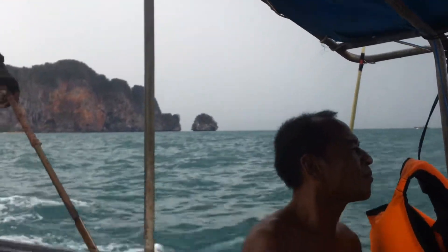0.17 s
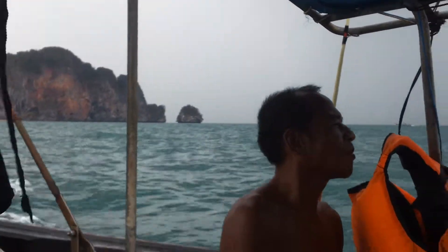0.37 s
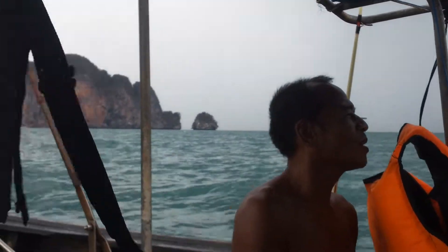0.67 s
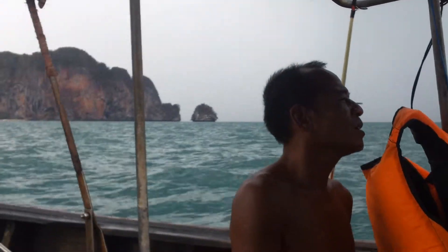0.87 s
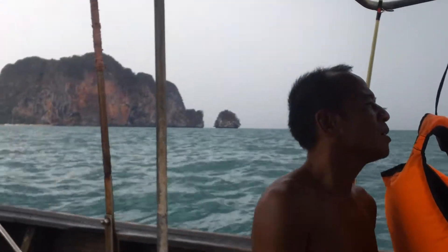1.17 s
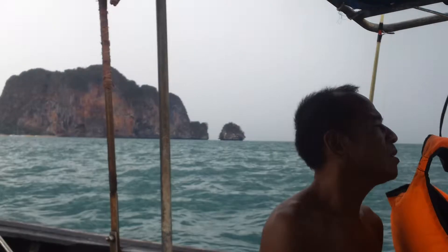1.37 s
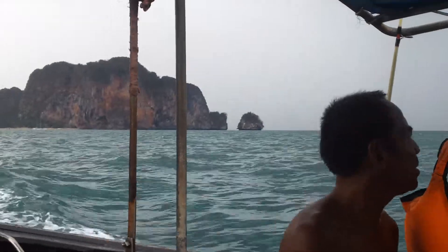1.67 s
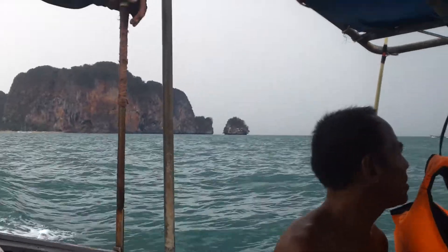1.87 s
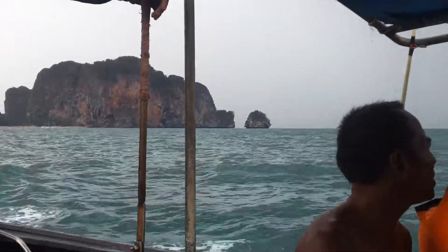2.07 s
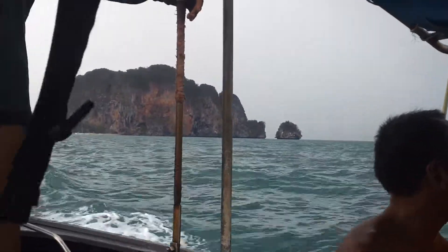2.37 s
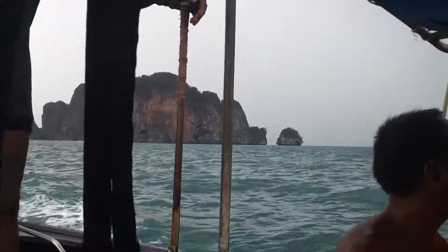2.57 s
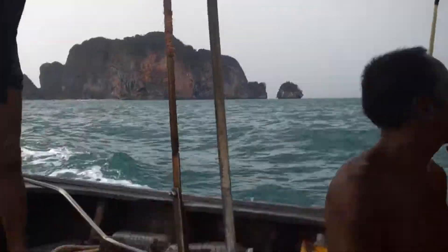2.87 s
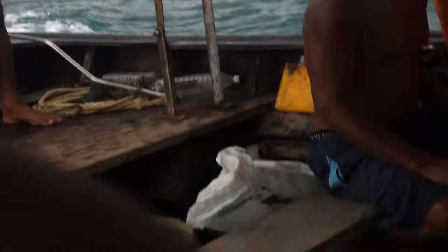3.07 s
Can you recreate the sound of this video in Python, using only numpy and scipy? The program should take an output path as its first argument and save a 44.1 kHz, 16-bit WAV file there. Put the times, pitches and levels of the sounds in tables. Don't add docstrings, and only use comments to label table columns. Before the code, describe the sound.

Unsilenced boat diesel drones steadily, roaring and clattering over hissing wash, with late wind thumps

```python
import sys
import numpy as np
from scipy import signal
from scipy.fft import rfft, irfft, next_fast_len
from scipy.io import wavfile

SR = 44100
rng = np.random.default_rng(int(sys.argv[2]) if len(sys.argv) > 2 else 0)


def invert_db(level):
    return 10 ** (np.asarray(level, dtype=float) / 20)


def materialize(psi):
    bounded = np.clip(np.atleast_2d(psi).T, -1, 1)
    quanta = np.round(bounded * 32767).astype(np.int16)
    wavfile.write(sys.argv[1], SR, quanta)


N = 142443

# (time [s], rate [Hz])
CYCLE_RATE = [(0, 12.95), (1.0, 12.97), (1.4, 13.02), (2.1, 12.98), (2.3, 13.16), (3.23, 13.2)]
# (time [s], level [dB])
ENGINE_LOAD = [(0.0, -17.5), (0.48, -21), (1.02, -19), (1.2, -21.5), (1.74, -20), (2.22, -20),
               (3.07, -19.5), (3.23, -19.5)]
# (multiple of the cycle rate [1], level [dB rms])
EXHAUST_ORDERS = [(4, -48), (6, -55), (8, -42), (10, -42), (12, -29.5), (14, -47), (16, -36.5), (18, -35),
                  (20, -31), (22, -40.5), (28, -35), (31, -36.5), (44, -34), (52, -37.5)]
# (time [s], level [dB])
BOAT_SWING = [(0, 2.5), (.15, 4.5), (.36, 3), (1.2, -0.5), (1.65, 1), (2.06, -1.5), (2.37, 0), (2.6, -3.5),
              (3.23, 4.5)]
# (place in cycle [0-1], exhaust puff [dB], cover ring [dB], knock [dB])
CYLINDERS = [
    (.06, 0, -6, 0),
    (.32, -1, -5, -1),
    (.59, -1, -2, -2),
    (.80, -1, 3.5, -1),
]
# (frequency [Hz], density [dB per Hz])
ROAR_SPECTRUM = [(40, -40), (90, -18.5), (150, 3.5), (300, 3.5), (500, -4), (900, -2.5), (1500, -6.5),
                 (4000, -25)]
# (frequency [Hz], width [Hz], boost [dB])
PIPE_MODES = [(243, 49, 2.8), (354, 15, 5), (388, 48, 10.1), (565, 53, 8.8), (627.4, 13.6, 14.5),
              (683, 110, 6.3), (877, 27, 7), (1123, 48, 6), (1204, 170, 9.1)]
# (frequency [Hz], width [Hz], level [dB], left over right [dB])
COVER_MODES = [(1614.4, 70, -22, 8.5), (1517, 75, -31, 4), (1377, 128, -24.5, 5), (1839, 45, -29, 9)]
# (frequency [Hz], width [Hz], level [dB], left over right [dB])
BLOCK_MODES = [(2420, 22, -41, 8), (2565, 140, -29, 3.5), (3250, 100, -28.5, 10), (4170, 250, -30, -2.5),
               (4790, 53, -42.5, 23), (4915, 26, -36.5, -5.5), (8170, 260, -32, 1)]
# (time [s], centre [Hz], level [dB])
INTAKE_WHISTLE = [(0, 6800, -25), (.45, 6950, -23), (.9, 6900, -24), (1.35, 7020, -22.5), (1.62, 6780, -25),
                  (1.9, 6950, -22), (2.5, 7020, -21.5), (2.8, 7030, -22), (3.23, 6860, -23.5)]
# (frequency [Hz], likeness [0-1])
PORT_LIKENESS = [(60, 0.35), (150, 0.88), (330, 1), (480, 0.67), (650, 0.49), (1100, 0.36), (1600, 0.11),
                 (3000, 0.07)]
# (frequency [Hz], lag [rad])
PORT_LAG = [(40, 0.66), (500, 0.39), (1000, 1.27), (1500, 3.73), (2300, 4.64), (3000, 9.64)]
# (frequency [Hz], left over right [dB])
PORT_BALANCE = [(30, 6), (100, 3), (300, 1), (800, 0), (1200, 4), (3000, -4.5)]
# (frequency [Hz], density [dB per Hz])
WAKE_SPECTRUM = [(300, -3.5), (1000, -4.5), (2200, -3.5), (3500, -3), (5800, -9.5), (8000, -12.5),
                 (11000, -19.5), (14000, -43.5)]
# (time [s], level [dB])
WAKE_SWELL = [(0.0, -17.5), (0.78, -17), (1.2, -16), (1.6, -17.5), (1.85, -16.5), (3.23, -17.5)]
# (frequency [Hz], left over right [dB])
WAKE_BALANCE = [(300, 9.5), (2500, -1), (5500, 3), (7000, -0.5), (9000, -14.5), (11000, -13), (14000, -32)]
# (time [s], length [s], left [dB], right [dB], top frequency [Hz])
WIND_BUFFETS = [(0.072, 0.039, -28, -20, 590), (0.097, 0.023, -33, -16, 600), (0.354, 0.034, -26, -32, 250),
                (2.036, 0.047, -19, -16, 1010), (1.532, 0.031, -10.5, -23, 500),
                (1.574, 0.04, -11.5, -26, 457), (2.252, 0.014, -22, -8, 594),
                (2.262, 0.013, -20, -4.5, 1120), (2.33, .015, -15, -17, 710), (2.4, 0.017, -36, -12, 595),
                (2.47, 0.016, -34, -9.5, 750), (2.483, .012, -30, -15, 604), (2.529, 0.046, -5, -7, 855),
                (2.526, 0.0069, -17, -5, 2700), (2.545, 0.011, -8, -17, 880), (2.645, 0.015, -14, -14, 790),
                (2.654, 0.0098, -16, -7, 900), (2.626, 0.012, -7, -11, 503), (2.696, 0.01, -32, -6, 800),
                (2.696, 0.0038, -30, -11, 2000), (2.706, 0.0093, -18, -7, 1000),
                (2.772, 0.061, -22, -18, 594), (2.796, .018, -11, -9.5, 940), (2.846, 0.017, -15, -32, 600),
                (3.081, 0.019, -17, -44, 690)]
# (time [s], level [dB])
WIND_STRENGTH = [(0, -2), (.8, 3), (1.4, 8), (2.1, 5), (2.3, 14), (2.75, 17.5), (3.23, 2)]

PORT_HZ, PORT_WIDTH_HZ, PORT_DB = 6947, 550, 11
KNOCK_S = .003


def rms_one(x):
    return x / np.sqrt(np.mean(x ** 2) + 1e-20)


def in_time(rows):
    return np.interp(np.arange(N) / SR, *np.transpose(rows))


def at_hz(points, hz):
    table_hz, value = np.transpose(points)
    return np.interp(np.log(hz + 1), np.log(table_hz), value)


def drift(rate_hz):
    r = np.exp(-80 * np.pi * rate_hz / SR)
    noise = rng.standard_normal(N // 40 + 2002)
    slow = signal.lfilter([1], [1, -2 * r, r * r], noise)[2000:]
    return np.interp(np.arange(N) / 40, np.arange(len(slow)), rms_one(slow))


def shape(x, gain):
    size = next_fast_len(N + 4096)
    hz = np.arange(size // 2 + 1) * SR / size
    return irfft(rfft(x, size) * gain(hz), size)[..., :N]


def resonance(x, hz, width_hz):
    r = np.exp(-np.pi * width_hz / SR)
    poles = [1, -2 * r * np.cos(2 * np.pi * hz / SR), r * r]
    return signal.lfilter([(1 - r * r) / 2, 0, (r * r - 1) / 2], poles, x)


def ports(common, own):
    def alike(hz):
        return np.clip(at_hz(PORT_LIKENESS, hz), 0, 1)

    def place(hz):
        lag = np.exp([[-.5j], [.5j]] * at_hz(PORT_LAG, hz))
        return lag * invert_db([[.5], [-.5]] * at_hz(PORT_BALANCE, hz)) / np.sqrt(2)

    shared = shape(common, lambda hz: place(hz) * np.sqrt(1 + alike(hz)))
    opposed = shape(own, lambda hz: place(hz) * np.sqrt(1 - alike(hz)) * [[1], [-1]])
    return shared + opposed


def bursts(turns, places, level_db, decay_s):
    uneven_db, attack_s = .8, .0019
    blows = np.zeros(N)
    uneven = rng.normal(0, uneven_db, (60, len(places)))
    for k, place in enumerate(places):
        at = np.searchsorted(turns, np.arange(60) + place)
        heard = at < N
        blows[at[heard]] += invert_db(level_db[k] + uneven[heard, k])
    decay = np.exp(-1 / (decay_s * SR))
    attack = np.exp(-1 / (attack_s * SR))
    poles = np.convolve([1, -decay], [1, -attack])
    return signal.lfilter([1 - attack], poles, blows + 1e-18), blows


def exhaust_tones(turns):
    firing_turn = .09
    wander_db, slip_rad = 1.6, .35
    drone = 0
    for order, db in np.array(EXHAUST_ORDERS):
        level = np.sqrt(2) * invert_db(db + wander_db * drift(2.6))
        phase = 2 * np.pi * order * (turns - firing_turn) + rng.normal(0, .87)
        drone = drone + level * np.cos(phase + slip_rad * drift(2.35))
    drone = drone * invert_db(in_time(BOAT_SWING))
    return ports(drone, .14 * np.roll(drone, 900))


def exhaust_roar(turns):
    puff_s, gated_share, pop_share, roar_db = .007, .15, .45, 2
    place, puff_db, *_ = np.transpose(CYLINDERS)
    swell, pops = bursts(turns, place, puff_db, puff_s)
    gate = 1 - gated_share + gated_share * rms_one(swell)
    gas = rng.standard_normal((2, N)) * gate * invert_db(drift(4.6))
    gas = gas + pop_share * rms_one(pops) * [[1], [0]]
    raw = shape(gas, lambda hz: invert_db(at_hz(ROAR_SPECTRUM, hz)))
    piped = raw
    for hz, width, db in PIPE_MODES:
        boost = (invert_db(db) - 1) * invert_db(.94 * drift(2.6))
        piped = piped + boost * resonance(raw, hz, width)
    common, own = rms_one(piped)
    return ports(common, own) * invert_db(in_time(ENGINE_LOAD) + roar_db)


def ringing_metal(turns, modes, column, decay_s, steady, wander_db):
    blow_share = 2.2
    cylinders = np.transpose(CYLINDERS)
    swell, blows = bursts(turns, cylinders[0], cylinders[column], decay_s)
    gate = steady + rms_one(swell)
    out = 0
    for hz, width, db, pan_db in modes:
        rattle = rms_one(resonance(rng.standard_normal((2, N)) * gate, hz, width))
        bloom = rms_one(resonance(resonance(blows, hz, 2 * width), hz, 2 * width))
        blow = blow_share * min(70 / width, 1) * bloom
        common, own = rms_one(rattle + blow * [[1], [0]])
        level = invert_db(db + wander_db * drift(5.5))
        out = out + level * ports(common, own) * invert_db([[pan_db / 2], [-pan_db / 2]])
    return out


def intake():
    width_hz, whistle_db, pan_db = 380, 3, -7.5
    rows = np.array(INTAKE_WHISTLE)
    carrier = np.exp(2j * np.pi * np.cumsum(in_time(rows[:, :2])) / SR)
    noise = rng.standard_normal((2, N)) + 1j * rng.standard_normal((2, N))
    slow = signal.sosfilt(signal.butter(2, width_hz, fs=SR, output="sos"), noise)
    level_db = in_time(rows[:, ::2]) + whistle_db - PORT_DB + 2.2 * drift(5.6)
    return rms_one((slow * carrier).real) * invert_db(level_db + np.array([[.5], [-.5]]) * pan_db)


def tappet(turns):
    swell, _ = bursts(turns, [.325], [-9], .003)
    tick = swell * rng.standard_normal((2, N))
    return resonance(tick, 6800, 1500) * invert_db([[-8], [0]])


def wake(turns):
    place, *_, knock_db = np.transpose(CYLINDERS)
    clatter, _ = bursts(turns, place, knock_db, KNOCK_S)
    beat = 2 + .23 * rms_one(clatter)
    hiss, together = 0, drift(4.9)
    for octave in range(8, 15):
        def band(hz):
            window = np.cos(np.pi / 2 * np.clip(np.log2(hz + 1) - octave, -1, 1))
            side_db = [[.5], [-.5]] * at_hz(WAKE_BALANCE, hz)
            return invert_db(at_hz(WAKE_SPECTRUM, hz) + side_db) * window

        flicker = invert_db(.43 * together + drift(42) + drift(7.7))
        hiss = hiss + shape(rng.standard_normal((2, N)), band) * flicker
    return rms_one(hiss * beat) * invert_db(in_time(WAKE_SWELL))


def wind_buffets():
    slap, span = 2.5, 3.4
    t, out = np.arange(N) / SR, np.zeros((2, N))
    for s, length, left_db, right_db, top_hz in WIND_BUFFETS:
        near = slice(max(int((s - .08) * SR), 0), int((s + .097) * SR))
        high_pass = signal.butter(4, max(top_hz / span, 140), "high", fs=SR, output="sos")
        low_pass = signal.butter(3, top_hz, fs=SR, output="sos")
        swell = np.exp(-((t[near] - s) / (length / 2)) ** 2)
        air = rng.standard_normal((2, 8000))[:, -len(swell):]
        air[:, swell.argmax() - 20] += slap * np.sqrt(SR / top_hz) * rng.choice([-1, 1])
        lumps = signal.sosfilt(np.vstack([high_pass, low_pass]), air) * swell
        energy = (lumps ** 2).sum(axis=1, keepdims=True)
        lumps = lumps / np.sqrt(energy / (swell ** 2).sum())
        out[:, near] += invert_db([[left_db], [right_db]]) * lumps
    return out


def wind_rumble():
    def low_band(hz):
        return 1 / (1 + (hz / 110) ** 2) * (hz / (hz + 80)) ** 3.9

    rumble = rms_one(shape(rng.standard_normal((2, N)), low_band))
    wander_db = 3.7 * np.array([drift(2.8), drift(1.9)])
    return invert_db(-42 + in_time(WIND_STRENGTH) + wander_db) * rumble


def scene():
    turns = -.035 + np.cumsum(in_time(CYCLE_RATE)) / SR
    exhaust = exhaust_tones(turns) + exhaust_roar(turns)
    cover = ringing_metal(turns + .03, COVER_MODES, column=2, decay_s=.006, steady=3.5, wander_db=.6)
    block = ringing_metal(turns + .035, BLOCK_MODES, column=3, decay_s=KNOCK_S, steady=1, wander_db=1.5)
    engine = exhaust + cover + block + intake() + tappet(turns)
    return engine + wake(turns) + wind_buffets() + wind_rumble()


def band_limit(x):
    return signal.sosfilt(signal.butter(12, 14330, fs=SR, output="sos"), x)


def record(dry):
    limit_db, release_db_per_s = -1, 120
    x = dry + (invert_db(PORT_DB) - 1) * resonance(dry, PORT_HZ, PORT_WIDTH_HZ)
    fall = release_db_per_s * np.arange(N) / SR
    peak_db = 20 * np.log10(np.abs(x).max(axis=0) + 1e-9)
    over = np.maximum(peak_db - limit_db, 0)
    held = np.maximum.accumulate(over + fall) - fall
    x = x * invert_db(-.3 * signal.lfilter([.02], [1, -.98], held))
    mix = 1.25 * np.tanh(x / 1.25)
    return band_limit(mix)


dry = scene()
out = record(dry)
materialize(out)
```